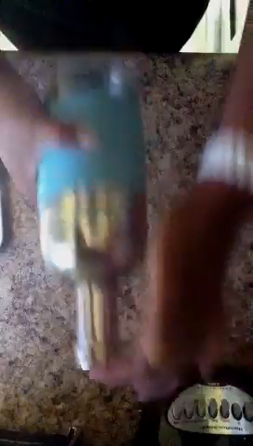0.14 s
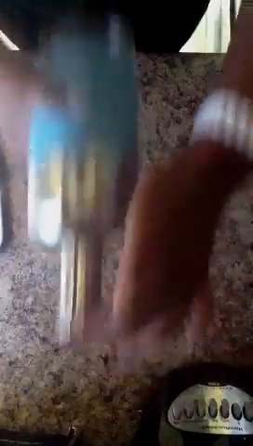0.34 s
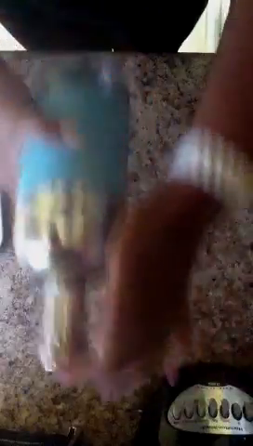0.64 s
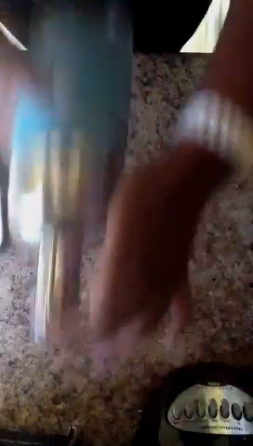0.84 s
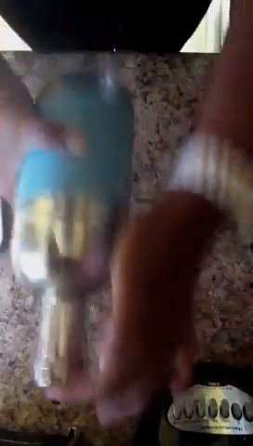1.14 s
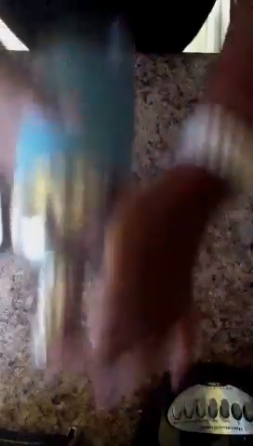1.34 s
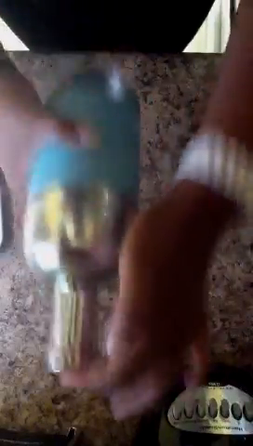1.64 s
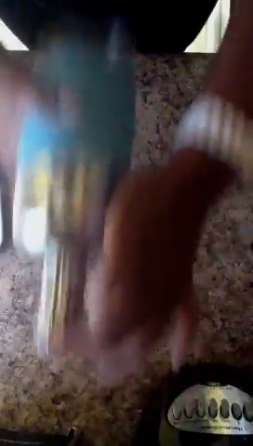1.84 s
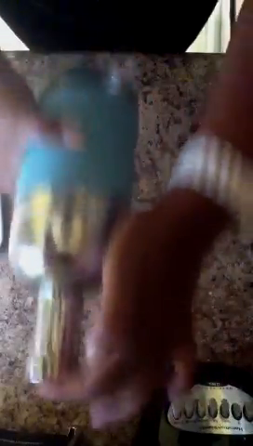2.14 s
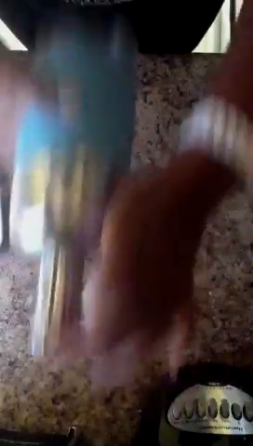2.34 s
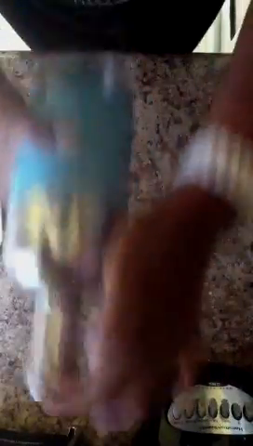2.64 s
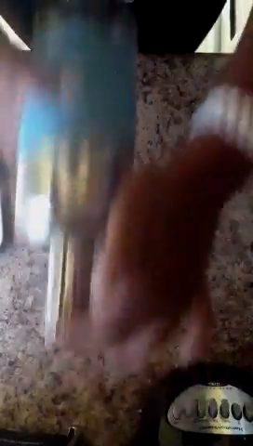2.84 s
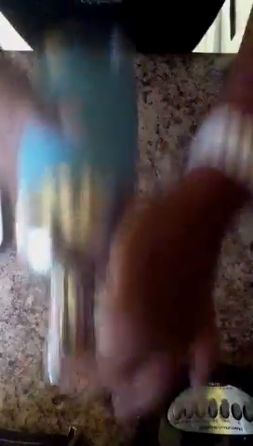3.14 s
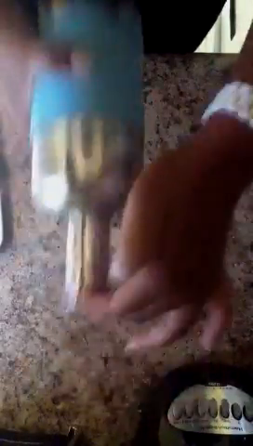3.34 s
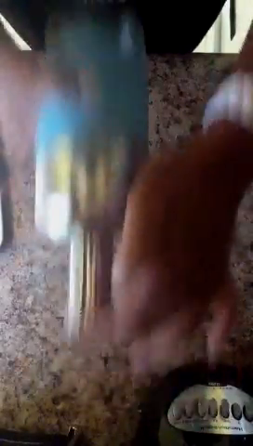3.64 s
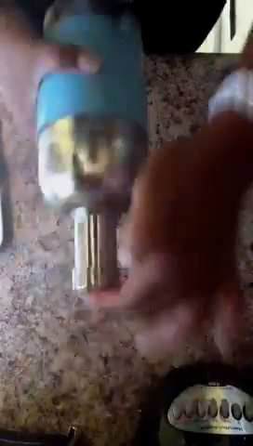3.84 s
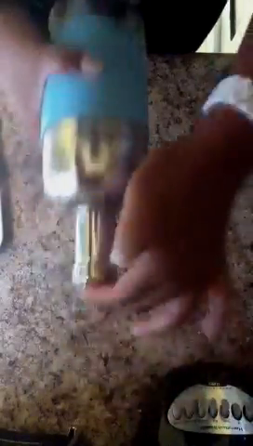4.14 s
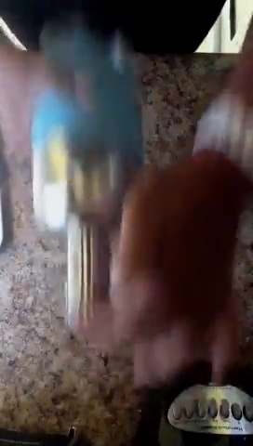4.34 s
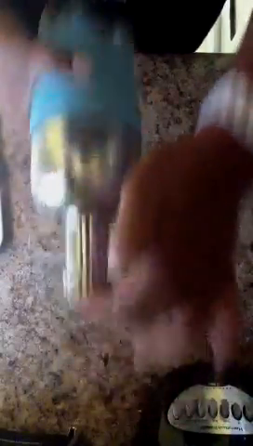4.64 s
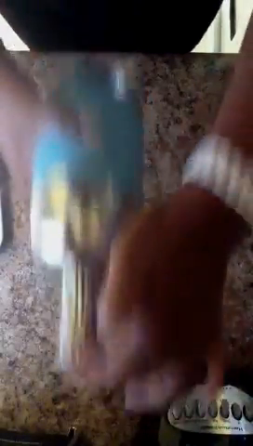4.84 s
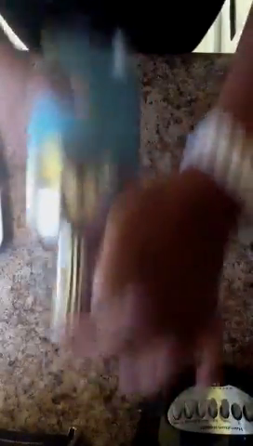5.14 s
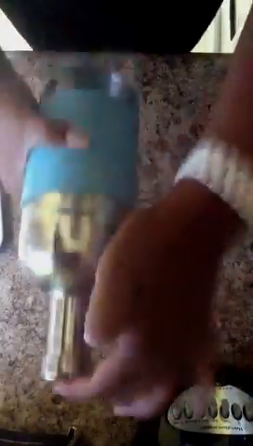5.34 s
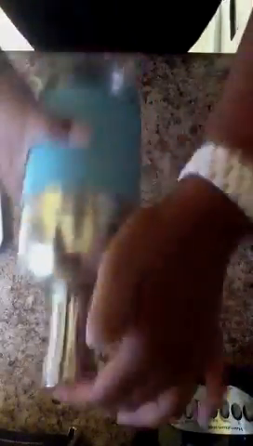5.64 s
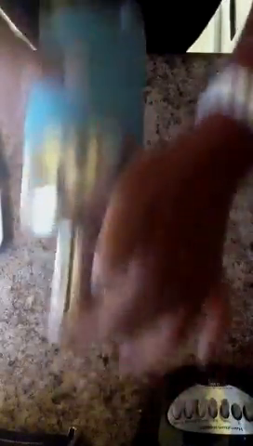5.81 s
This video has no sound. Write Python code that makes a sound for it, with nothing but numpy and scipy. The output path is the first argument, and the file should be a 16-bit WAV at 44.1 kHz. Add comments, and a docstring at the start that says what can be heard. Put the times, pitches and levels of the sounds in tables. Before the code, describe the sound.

From 0 s the shaking is already in full swing: loose ice cubes thrown to and fro in a hand-held steel cocktail shaker, roughly four strokes a second, slightly irregular. Every stroke is a quick surge of overlapping impacts, then a softer back surge about 0.1 s later. Hits vary: hollow, damped booms, short metallic wall rings, bright clinks and crisp ice cracks. Particularly strong knocks fall near 0.13, 1.4, 2.7 and 3.7 s. Between them hundreds of tiny chips rattle and the drink hisses, swelling and dipping with the strokes. From about 4.5 s the rhythm loosens, with slightly wider gaps and lighter strokes around 5.1 s, yet it continues to the cut at about 6 s. The sound is close, dry and bright with little bass, a short dull room tail, and a barely audible low kitchen rumble that eases after 4.1 s.

```python
"""In a kitchen, close to a phone: ice cubes thrown to and fro in a hand-held steel shaker, about four strokes a second.
Each cube that lands booms in the hand-damped can (decaying modes), rings its wall, cracks (noise bursts) and clinks.
Random chips and melt water clatter between, and filtered noise makes the drink hiss; both swell with the strokes.
A short room tail follows the shaker, over a low kitchen rumble of shaped noise with a faint sine hum."""
import sys
import numpy as np
from scipy import signal
from scipy.fft import rfft, irfft
from scipy.io import wavfile

SR = 44100
rng = np.random.default_rng(int(sys.argv[2]) if len(sys.argv) > 2 else 0)


def master(y):
    """Save y as 16-bit WAV."""
    cut = np.clip(np.atleast_2d(y).T, -1, 1)
    pcm = np.round(cut * 32767)  # scale
    wavfile.write(sys.argv[1], SR, pcm.astype(np.int16))


N = 263420  # length in samples


def undb(db):
    """Decibels to amplitude; twice the decibels gives energy."""
    return 10 ** (np.asarray(db) / 20)


def kitchen(rumble_db=-56.5, hum_hz=59, hum_db=-85):
    """A low rumble of shaped noise with a faint mains hum; both ease off towards the end."""
    # spectrum of the rumble, only its shape matters: hz [Hz], density_db [dB per Hz]
    spectrum = [(15, -57), (25, -20), (86, -8), (199, 7.5), (221, 13.5), (260, -16), (400, -0.5),
                (520, 5.5), (880, -120)]
    hz, density_db = np.transpose(spectrum)
    t = np.arange(N) / SR
    bin_hz = np.arange(1, N // 2 + 2) * SR / N
    shape_db = np.interp(np.log(bin_hz), np.log(hz), density_db)
    rumble = irfft(rfft(rng.standard_normal(N)) * undb(shape_db), N)
    rumble = rumble * undb(rumble_db) / rumble.std()
    hum = np.sqrt(2) * undb(hum_db) * np.sin(2 * np.pi * hum_hz * t)
    ease_db = np.interp(t, (4.1, 4.6), (0, -4.5))
    return (rumble + hum) * undb(ease_db)


def tumble_db(t, rise_db_per_s=288, fall_db_per_s=113, lull_db=-36):
    """Each surge of the loose load swells quickly and dies away more slowly; their energies add."""
    # strokes of the shaker, the load surging at one end, then at the other:
    # surge_s [s, when the surge is loudest], surge_db [dB], back_after_s [s after that peak], back_surge_db [dB]
    strokes = [(-0.1, -31, 0.094, -25), (0.146, -18, 0.15, -25), (0.414, -19.5, 0.093, -24.5),
               (0.65, -26, 0.096, -25), (0.89, -23.5, 0.099, -21), (1.17, -21, 0.079, -20),
               (1.41, -22.5, 0.11, -21.5), (1.68, -18.5, 0.11, -34), (1.895, -20.5, 0.1, -22.5),
               (2.142, -25.5, 0.11, -21), (2.428, -19.5, 0.07, -33), (2.64, -24.5, 0.11, -24.5),
               (2.939, -23.5, 0.062, -25), (3.171, -20, 0.11, -21), (3.47, -20.5, 0.11, -29.5),
               (3.7, -22, 0.076, -23), (3.956, -19, 0.13, -24.5), (4.215, -23.5, 0.02, -18.5),
               (4.38, -24, 0.13, -27.5), (4.801, -21, 0.17, -28.5), (5.069, -28.5, 0.1, -29),
               (5.33, -24.5, 0.13, -25), (5.615, -29.5, 0.12, -27), (5.855, -25, 0.051, -24.5)]
    surge_s, surge_db, back_after_s, back_surge_db = np.transpose(strokes)
    peak_s = np.append(surge_s, surge_s + back_after_s)
    peak_db = np.append(surge_db, back_surge_db)
    from_peak_s = t[:, None] - peak_s  # negative while the surge swells
    db = peak_db + np.minimum(rise_db_per_s * from_peak_s, -fall_db_per_s * from_peak_s)
    energy = undb(2 * db).sum(axis=1) + undb(2 * lull_db)
    return 10 * np.log10(energy)


def slosh(level_db=-12.5, low_hz=1500, high_hz=9000):
    """The drink hisses along the wall as the load tumbles: band-passed noise under the tumble level."""
    sos = signal.butter(1, [low_hz, high_hz], "bandpass", fs=SR, output="sos")
    hiss = signal.sosfilt(sos, rng.standard_normal(N))
    grid_s = np.arange(0, N / SR, .001)  # the level in 1 ms steps
    swell_db = np.interp(np.arange(N) / SR, grid_s, tumble_db(grid_s))
    return hiss * undb(swell_db + level_db)


def train(s, size):
    """One impulse for each blow."""
    x = np.zeros(N)
    place = np.clip((s * SR).astype(int), 0, N - 1)
    np.add.at(x, place, size)
    return x


def fade(x, tau):
    """Every impulse dies away exponentially with time constant tau in seconds."""
    pole = np.exp(-1 / (max(tau, 1e-4) * SR))
    return signal.lfilter([1], [1, -pole], x + 1e-18)  # the offset keeps the filter out of denormals


def ring(s, db, clink_hz, modes, spot_db, near_db=8.0, near_octaves=0.14):
    """Each blow lands at another spot: every mode gets its own strength and sign, with a lift near the clink."""
    out = 0
    chance = rng.standard_normal((len(s), len(modes), 2))
    for k, (hz, mode_db, t60) in enumerate(modes):
        near = near_db * np.exp(-(np.log2(hz / clink_hz) / near_octaves) ** 2)
        strength_db = db + mode_db + near + spot_db * chance[:, k, 1]
        push = train(s, np.sign(chance[:, k, 0]) * undb(strength_db))
        # a complex pole is one decaying sine
        pole = np.exp(2j * np.pi * hz / SR - np.log(1000) / (max(t60, .005) * SR))
        out = out + signal.lfilter([1], [1, -pole], push + 1e-18).imag
    return out


def burst(s, db, bands, spot_db, tail_db, rise=0.00024, tick_db=-12.5, grit=0.88):
    """A tick at first touch, then a snap with a weaker tail in each band of dense modes."""
    out = 0
    chance = rng.standard_normal((len(s), len(bands)))
    # the cube chatters on the wall: a spiky drive of about unit power, common to the bands
    spikes = np.exp(grit * np.minimum(rng.standard_normal(N), 2) - grit ** 2)
    chatter = rng.standard_normal(N) * spikes
    for k, (hz, width, band_db, snap, tail) in enumerate(bands):
        sos = signal.butter(2, [hz - width / 2, hz + width / 2], "bandpass", fs=SR, output="sos")
        narrow = SR / 2 / width  # makes up for what the band leaves out
        push = train(s, undb(2 * (db + band_db + spot_db * chance[:, k])))  # energies add
        decay = fade(push, snap) + undb(2 * tail_db) * fade(push, tail)
        energy = fade(decay, rise) / max(rise * SR, 1)  # softens the onset
        tick = undb(tick_db) * narrow * np.sqrt(push)
        out = out + signal.sosfilt(sos, chatter * np.sqrt(narrow * energy) - tick)
    return out


def clink(s, db, clink_hz, turns, size=2048):
    """The cube and the wall under it ring at their own pitch: a sine that decays over a few turns."""
    cycle = clink_hz[:, None] * np.arange(size) / SR
    decay = np.exp(-cycle / turns[:, None])
    grains = undb(db)[:, None] * np.sin(2 * np.pi * cycle) * decay
    place = (s * SR).astype(int)[:, None] + np.arange(size)
    return np.bincount(place.ravel(), grains.ravel(), N + size)[:N]


def can(s, ring_db, boom_db, crack_db, clink_hz, spot_db):
    """What the shaker does when ice strikes it: hollow boom, wall ring, ice crack and clink add up."""
    # modes of the hollow can, damped by hands and drink: hz [Hz], mode_db [dB], t60_s [s]
    boom_modes = [(439, -5.5, 0.058), (562, -4.5, 0.092), (649, -3.5, 0.096), (761, -3.5, 0.12),
                  (851, -3.5, 0.072), (940, -37, 0.017)]
    # modes of the steel wall: hz [Hz], mode_db [dB], t60_s [s]
    wall_modes = [(1200, -35, 0.035), (1300, 0, 0.063), (1541, -8.5, 0.16), (1874, 2, 0.04),
                  (2010, -5.5, 0.24), (2094, 3, 0.047), (2104, -1, 0.065), (2802, -7, 0.069),
                  (3240, -15.5, 0.075), (3470, -7.5, 0.024), (4644, -3, 0.062), (5280, -4, 0.031),
                  (6940, -22, 0.049)]
    # can modes too dense to tell apart, the first band for the boom, the others for the wall:
    # hz [Hz], width_hz [Hz], band_db [dB], snap_s [s], tail_s [s]
    shell_bands = [(638, 680, -16, 0.0014, 0.035), (1728, 1190, -10.5, 0.0015, 0.014),
                   (2706, 2340, -11, 0.0028, 0.02)]
    # the cracking ice, same columns: hz [Hz], width_hz [Hz], band_db [dB], snap_s [s], tail_s [s]
    crack_bands = [(5340, 3680, 0.17, 0.00085, 0.0074), (7990, 5440, 0.097, 0.0011, 0.0089),
                   (11570, 5430, -0.64, 0.00067, 0.0065)]
    boom = ring(s, boom_db - 18, clink_hz, boom_modes, spot_db)
    boom = boom + burst(s, boom_db, shell_bands[:1], spot_db, tail_db=-13)
    wall = ring(s, ring_db - 18, clink_hz, wall_modes, spot_db)
    wall = wall + burst(s, ring_db, shell_bands[1:], spot_db, tail_db=-10)
    crack = burst(s, crack_db - 9.0, crack_bands, spot_db, tail_db=-10)
    # a low clink follows the boom and lasts more turns, a high one follows the crack
    low, high = clink_hz < 1000, clink_hz > 4000
    clink_db = np.where(high, crack_db - 4.0, ring_db - 2.0)
    clink_db = np.where(low, boom_db - 5.5, clink_db)
    turns = np.where(low, 7.5, 6.0)
    return boom + wall + crack + clink(s, clink_db, clink_hz, turns)


def chips(count=1500, spread_db=4.5, most_db=6.5, hardness_db=11.0, level_db=-10.0, boom_db=-10.5, crack_db=-2.0):
    """Hundreds of small taps a second, few of them large; hard ones crack and clink high, soft ones boom."""
    chance = rng.random((count, 3))
    s = chance[:, 0] * N / SR
    size_db = np.minimum(-spread_db * np.log(1 - chance[:, 1]), most_db)
    db = tumble_db(s) + level_db + size_db
    hard = 2 * chance[:, 2] - 1  # -1 soft, 1 hard
    tap_boom_db = db + boom_db - hardness_db * hard
    tap_crack_db = db + crack_db + hardness_db * hard
    return can(s, db, tap_boom_db, tap_crack_db, 2400 * 3.57 ** hard, spot_db=5.5)


def knocks():
    """The cubes that stand out: each landing drives the can with its own balance and clink pitch."""
    # cubes landing: land_s [s], ring_db [dB, wall ring], boom_db [dB over ring, hollow boom],
    # crack_db [dB over ring, ice crack], clink_hz [Hz]
    landings = [(0.027, -22.5, -19, 7.5, 2960), (0.132, -10, -6, -26, 604), (0.382, -14, -2, 1.5, 682),
                (0.432, -25, 1, 7, 4630), (0.458, -16.5, 0.5, 2, 1970), (0.613, -18.5, 7, -23, 2100),
                (0.673, -14.5, -3, -3, 2080), (0.703, -13.5, -27, 0, 7300), (0.87, -17, -10, 1.5, 4640),
                (0.884, -18, 8, -1, 722), (0.941, -13, -1.5, 5, 2150), (1.126, -11.5, -27, -3, 1290),
                (1.16, -14, -18, -12, 2750), (1.221, -16.5, -29, 6.5, 4970), (1.272, -18.5, -27, 8, 4550),
                (1.307, -13.5, -21, 5.5, 3280), (1.394, -5.5, -1.5, -12, 787), (1.403, -9, -1.5, -3, 2100),
                (1.417, -17, -23, -6, 1990), (1.462, -20.5, -6, 12.5, 740), (1.557, -20.5, -0.5, 4, 2150),
                (1.631, -15, -2, -18, 767), (1.673, -15.5, -3, 0.5, 2700), (1.739, -25.5, 7, 10, 4700),
                (1.861, -21, -2, -6, 2050), (1.882, -13, 1, -2, 2250), (1.895, -17.5, 6, 2.5, 2140),
                (1.927, -15, -15, 3.5, 2060), (1.995, -25, -14, 6.5, 5500), (2.12, -14.5, -20, -0.5, 1394),
                (2.13, -17.5, -6, -15, 2270), (2.148, -25.5, 15, 17, 877), (2.185, -17, -3.5, 1, 2020),
                (2.416, -18, -9, 0, 2980), (2.427, -15.5, -11, -1, 2050), (2.619, -25.5, -24, 19, 5700),
                (2.648, -16.5, 0, 9, 936), (2.678, -10, -1, -4, 825), (2.698, -23.5, 10, -15, 2000),
                (2.779, -27.5, 0, 14, 7500), (2.909, -19, -6, 7, 1730), (2.921, -13.5, -1, 7, 7900),
                (2.941, -15.5, 2, 1, 812), (2.952, -17.5, -7, 1.5, 6300), (3.085, -18, -37, 5, 2180),
                (3.148, -24, 2, 16, 5450), (3.173, -13.5, 4.5, -1, 783), (3.188, -15.5, -12, -1, 1940),
                (3.454, -18, -13, 6.5, 1430), (3.469, -17.5, 3, -12, 1340), (3.483, -19.5, -3.5, 8.5, 693),
                (3.578, -24.5, -26, 11, 2080), (3.645, -17.5, -21, 5.5, 4900), (3.68, -11.5, 7.5, -17, 811),
                (3.691, -10, -0.5, -11, 759), (3.706, -12, -7, -8, 840), (3.726, -24.5, 7, 11.5, 652),
                (3.928, -20, -19, -14, 4230), (3.947, -15, 3.5, 8, 789), (4.008, -12, -4.5, -5, 579),
                (4.196, -12.5, -36, 0, 3500), (4.209, -15.5, -31, 8.5, 3600),
                (4.248, -10.5, -1.5, -4, 1560), (4.356, -18, -4, -20, 2000), (4.468, -15.5, -10, 9.5, 3500),
                (4.513, -17, 3, 9.5, 4500), (4.544, -15, -1.5, -8, 1600), (4.717, -21.5, -3, -6, 2230),
                (4.765, -19.5, 4, -5, 1450), (4.824, -23.5, 7.5, 10, 7400), (5.081, -32, -8.5, 19.5, 6860),
                (5.083, -29.5, -5, 16, 5560), (5.099, -25, 5, 14.5, 6700), (5.19, -21.5, -4.5, 1, 2010),
                (5.224, -23, -9, -5, 1190), (5.277, -14, -33, 6, 1910), (5.318, -16, -29, -0.5, 3250),
                (5.339, -16.5, -16, 3, 2010), (5.351, -22.5, -1.5, 7.5, 4640), (5.536, -33.5, 7, 0, 620),
                (5.589, -19.5, -1.5, -23, 1210), (5.609, -14, -6, 2, 2110), (5.729, -28.5, 8.5, 9, 6500),
                (5.77, -15.5, -29, -5, 2060), (5.821, -20, -25, 11, 4700), (5.836, -13.5, -31, 1, 2000),
                (5.851, -12.5, -31, -2, 5800), (5.86, -19, -9, 5, 2000), (5.891, -18, 2.5, -6, 1240),
                (5.954, -24.5, -7, -14, 1140)]
    land_s, ring_db, boom_db, crack_db, clink_hz = np.transpose(landings)
    return can(land_s, ring_db, ring_db + boom_db, ring_db + crack_db, clink_hz, spot_db=2.5)


def room(x, t60=0.49, wet_db=-18.0, damp_hz=5000):
    """Tiles and cupboards return a short, duller tail: decaying low-passed noise convolved with the sound."""
    t = np.arange(SR // 2) / SR
    tail = rng.standard_normal(len(t)) * np.exp(-np.log(1000) * t / t60)
    tail = tail * (t > .003)  # a short gap before the tail
    tail = signal.lfilter(*signal.butter(1, damp_hz, fs=SR), tail)
    tail = tail / np.sqrt(np.sum(tail ** 2))
    return x + undb(wet_db) * signal.fftconvolve(x, tail)[:N]


def scene(can_low_hz=297):
    """The shaker in its room over the kitchen; a small can radiates little bass, hence the high-pass."""
    load = knocks() + chips() + slosh()
    bass_cut = signal.butter(4, can_low_hz, "highpass", fs=SR, output="sos")
    shaker = signal.sosfilt(bass_cut, load)
    return (room(shaker) + kitchen())[None]


def record(dry, mic_top_hz=15200, top_hz=16500):
    """The phone falls off above its top and then cuts: two steep low-passes in a row."""
    falloff = signal.ellip(8, 1, 35, mic_top_hz, fs=SR, output="sos")
    cut = signal.ellip(8, .2, 25, top_hz, fs=SR, output="sos")
    return signal.sosfilt(cut, signal.sosfilt(falloff, dry))


dry = scene()
out = record(dry)
master(out)
```